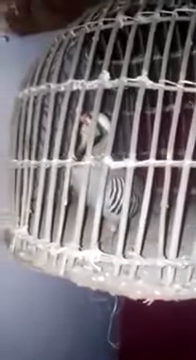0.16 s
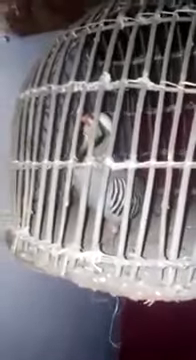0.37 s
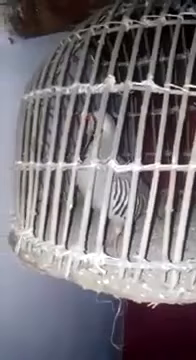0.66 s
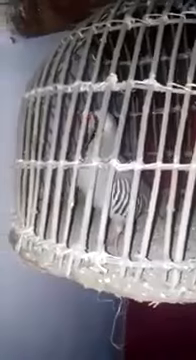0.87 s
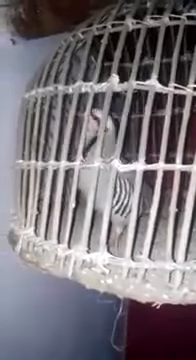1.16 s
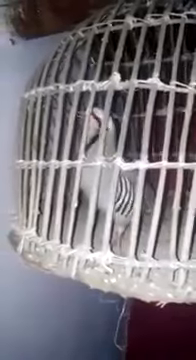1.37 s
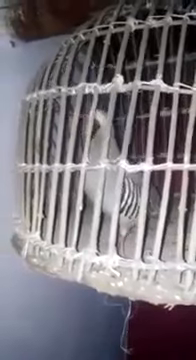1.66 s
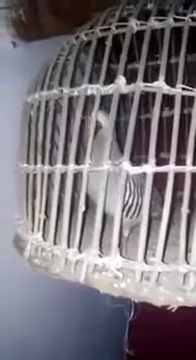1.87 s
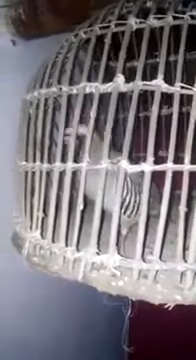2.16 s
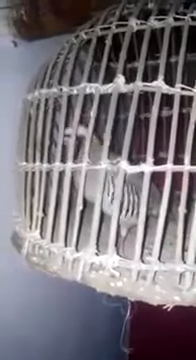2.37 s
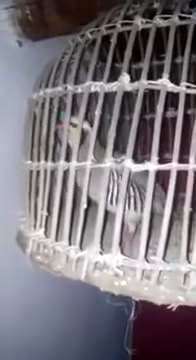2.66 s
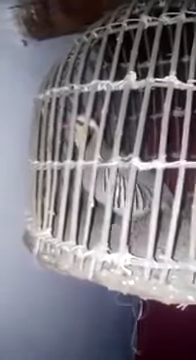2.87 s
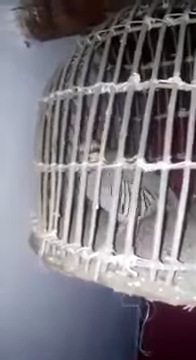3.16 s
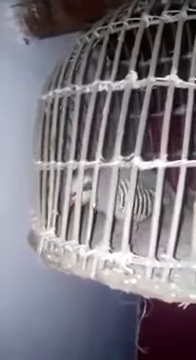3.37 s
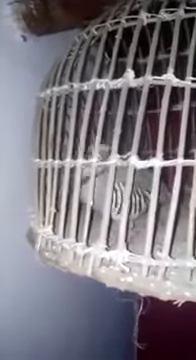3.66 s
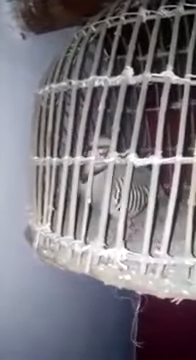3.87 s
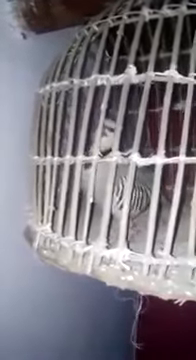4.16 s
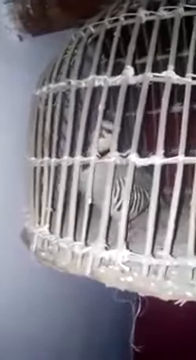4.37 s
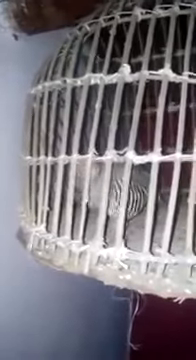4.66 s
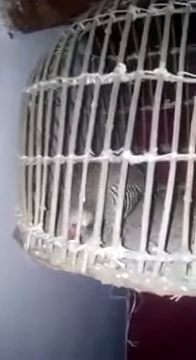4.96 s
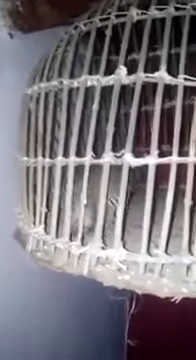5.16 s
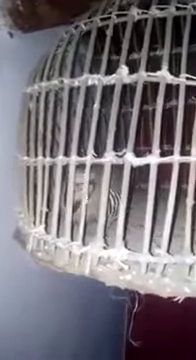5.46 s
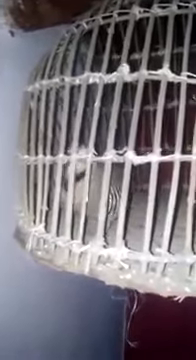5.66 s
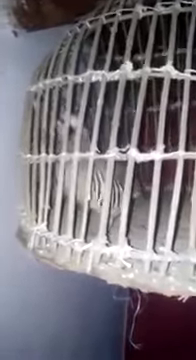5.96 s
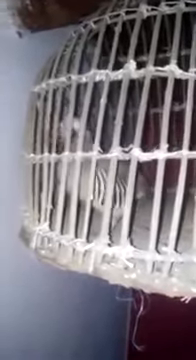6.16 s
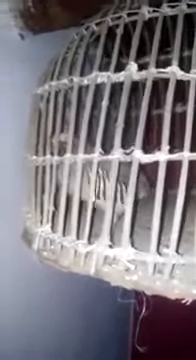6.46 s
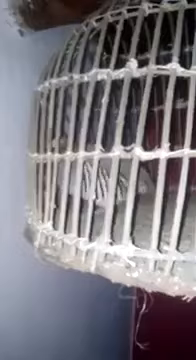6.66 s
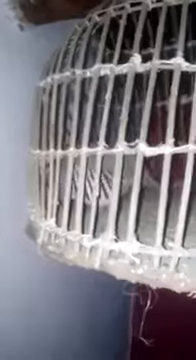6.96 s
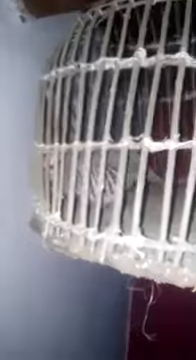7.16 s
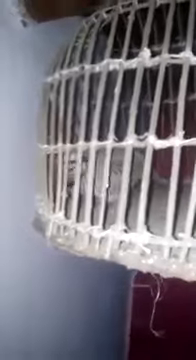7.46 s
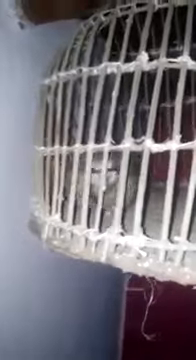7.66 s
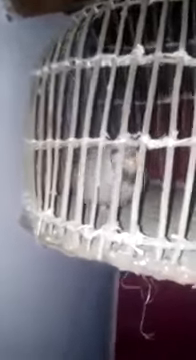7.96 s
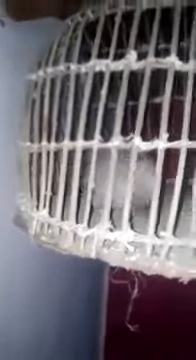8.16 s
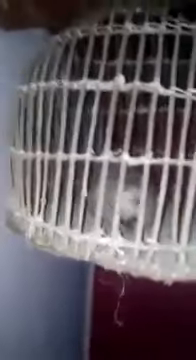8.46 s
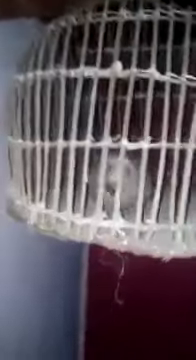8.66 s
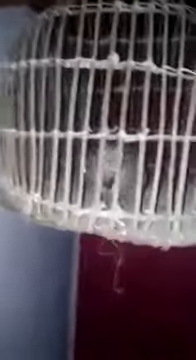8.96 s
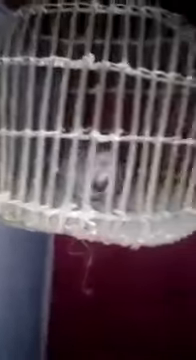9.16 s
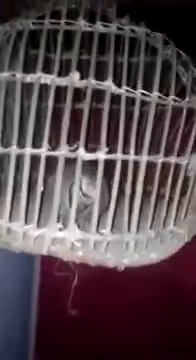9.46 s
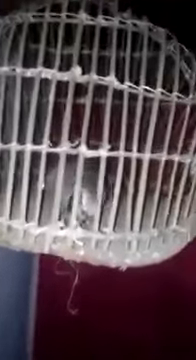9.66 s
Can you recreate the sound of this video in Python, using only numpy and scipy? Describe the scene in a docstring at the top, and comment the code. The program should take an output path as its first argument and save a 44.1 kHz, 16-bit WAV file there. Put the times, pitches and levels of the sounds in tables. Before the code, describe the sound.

A caged partridge calls loudly in rapid, harsh notes, then weakens into squeaks and short clucks, followed by soft bumps on the cage.

```python
"""Loud, harsh calls come first, with wheezes between: a partridge in a wicker cage, in a small hard room.
The calls weaken into squeaks and short clucks; then only soft bumps and scratches on the cage are left.
The voice is a source and a filter: the two sides of the syrinx chop the breath into pulses, and the
resonances of throat and beak shape them. Near walls add dense echoes over a faint drone,
and the loud calls drive the nearby recorder into its limiter."""
import sys
import numpy as np
from scipy import signal
from scipy.fft import rfft, irfft, next_fast_len
from scipy.io import wavfile
from scipy.ndimage import uniform_filter1d, minimum_filter1d, map_coordinates

SR = 44100
rng = np.random.default_rng(int(sys.argv[2]) if len(sys.argv) > 2 else 0)


def int16_out(signal):
    """Quantize to a 16-bit WAV file."""
    q = np.round(np.clip(np.atleast_2d(signal).T, -1, 1) * 32767)
    wavfile.write(sys.argv[1], SR, q.astype(np.int16))


N = 432614

# The room's low drone. Each row: time in seconds, level in dB.
DRONE_LEVELS = [(0, -66), (1.6, -72), (2.5, -61), (4.8, -78), (6.5, -87), (9.8, -96)]
# Reverberation. Each row: frequency in Hz, time to decay by 60 dB in seconds.
ROOM_T60 = [(150, .18), (500, 0.28), (1400, 0.26), (4000, .21), (10000, 0.25)]
# Spectral envelopes of the noises and of the voice. Each row: frequency in Hz, relative gain in dB.
FLOOR_SPECTRUM = [(20, -8.5), (50, -10.5), (85, 2), (130, -2), (400, -22.5), (1500, -33), (13000, -36)]
SCRATCH_SPECTRUM = [(300, -3), (1200, -20), (2200, -13.5), (3500, 2), (5500, 0), (8000, -11.5),
                    (13000, -21.5)]
WHEEZE_SPECTRUM = [(300, -10), (800, 9.5), (1200, -7), (2500, -0.5), (3400, -21), (4300, -14), (5000, -4),
                   (5800, 7), (9000, -17.5)]
CLUCK_SPECTRUM = [(200, -19), (400, -6.5), (650, -3.5), (1250, -2), (1700, -23), (3000, -43), (8000, -50.5)]
THROAT_SPECTRUM = [(300, -69), (600, -3.5), (850, 1.5), (1300, 10), (2500, 7), (3200, 0), (3900, -18.5),
                   (6000, -41), (9000, -53)]
BEAK_SPECTRUM = [(1200, -43), (2400, -7), (3000, -7.5), (6800, -7.5), (7500, -7.5), (8300, -19.5),
                 (10000, -8), (13000, -0.5)]
SHRIEK_SPECTRUM = [(1200, -47), (2400, -9), (3000, 1), (6800, -11.5), (8300, -12.5), (10000, -8),
                   (13000, -10.5)]
SQUEAL_SPECTRUM = [(2000, -28), (3400, -2), (5200, -1), (6800, -2.5), (8500, -21), (13000, -30.5)]
# Resonances of the bird's airway. Each row: centre in Hz, bandwidth in Hz, relative gain in dB.
WHEEZE_FORMANTS = [(1237.4, 250, -1), (1670, 33, 16.5), (2100, 250, 7.5), (5000, 400, -6)]
SNAP_FORMANTS = [(2063, 340, 3), (3600, 350, 0), (4160, 420, -2), (5426, 930, -11), (6230, 770, -14)]
RASP_FORMANTS = [(3790, 200, -15), (4953, 240, 1.5), (6470, 620, -1.5)]
SHRIEK_FORMANTS = [(2680, 350, 1.5), (3510, 100, 7.5), (3850, 800, -2), (5400, 1000, -2.5), (5830, 460, -3)]
SQUEAL_FORMANTS = [(3880, 500, -6.5), (4860, 550, 0.5), (6320, 1100, -10.5)]
# Contacts with the cage. Each row: start in seconds, thud level in dB, thud cutoff in Hz,
# scratch level in dB, rise time in seconds.
CAGE_CONTACTS = [(5.241, -47, 300, -36, 0.003), (6.422, -65, 300, -45, 0.0048),
                 (8.143, -49, 334, -59.5, 0.013), (8.205, -61, 300.6, -44, .004),
                 (8.27, -59, 299, -55.5, 0.008), (8.382, -46.5, 643, -44.5, 0.01),
                 (8.48, -50, 300, -63.5, 0.0035), (8.506, -59, 200.5, -59.5, 0.0101),
                 (8.582, -71, 298, -48.5, 0.015), (8.818, -43.5, 390, -56, 0.013),
                 (9.04, -64, 200, -59, 0.031), (9.294, -66, 400, -55.5, 0.025),
                 (9.55, -58, 150.3, -83, .01), (9.64, -61.5, 150, -82, .012), (9.75, -68, 402, -52, 0.014),
                 (9.774, -38.5, 675, -36.5, .014)]
# Breaths between calls. Each row: start in seconds, length in seconds.
BREATHS = [(0, 0.095), (0.38, 0.085), (0.802, 0.081), (1.21, 0.092), (1.643, 0.082), (2.067, 0.064),
           (2.502, 0.084), (3.124, 0.075), (3.216, 0.077), (3.555, 0.16), (3.873, 0.21), (4.154, 0.062),
           (4.443, 0.018)]
# Clucks. Each row: start in seconds, length in seconds, final pitch in Hz, tone level in dB,
# snap level in dB.
CLUCK_NOTES = [(6.438, .038, 552.2, -33.5, -25.5), (6.473, 0.042, 543, -34.5, -31),
               (6.527, 0.012, 423.3, -33.5, -35), (6.682, 0.045, 640, -35, -31.5),
               (6.734, 0.014, 751, -31, -20.5), (6.844, .041, 637.5, -29.5, -24),
               (7.017, .039, 825, -32, -22.5), (7.061, 0.023, 763.5, -33, -24),
               (7.102, .019, 689.6, -35, -26.5), (7.171, 0.036, 417.3, -31.5, -27),
               (7.294, .056, 651, -26, -20.5), (7.388, 0.024, 384.8, -30.5, -23),
               (7.558, 0.014, 567, -39.5, -39), (7.577, .018, 592.2, -32, -15.5),
               (7.615, 0.0092, 549, -32, -11), (7.651, .021, 548, -30.5, -21.5),
               (7.896, .02, 589.6, -41.5, -39.5), (7.925, 0.046, 606, -50.5, -60)]
# Calls. Each row: start, length and attack in seconds, level in dB, relative levels of fundamental and
# rasp in dB, gape from 0 to 1, delay of the widest gape in seconds, base centre and bandwidth of the
# throat resonance in Hz, lower voice's mid-call pitch in Hz, then, from 0 to 1, base roughness,
# upper voice's share and base shriek share.
CALL_NOTES = [ (0.114, .226, 0.029, -7.5, -21, -16, 0.16, .04, 1504, 601, 484, 0.79, 0.43, 0.09),
              (0.523, 0.22, 0.013, -7.5, -18.5, -15, 0.87, 0.089, 1497, 557, 472.5, 0.7, 0.5, 0.06),
              (0.932, 0.23, 0.018, -7.5, -16.5, -16, 0.79, 0.096, 1462, 402, 455.7, 0.46, 0.37, 0.07),
              (1.358, 0.24, 0.018, -7.5, -18.5, -14, 0.89, 0.084, 1481, 334, 456.2, 0.57, 0.63, 0.09),
              (1.779, 0.21, 0.027, -10, -15, -12, .05, 0.021, 1454, 360, 479.2, 0.51, 0.16, 0.06),
              (2.137, 0.27, 0.036, -8, -19, -15.5, 1, .105, 1502, 540, 494.6, 0.74, 0.47, 0.04),
              (2.529, 0.25, 0.03, -6.5, -19.5, -14.5, 0.87, 0.097, 1597, 616, 505.8, 0.66, 0.37, 0.13),
              (2.938, .178, 0.022, -9, -15.5, -14.5, 0.18, 0.089, 1385, 450, 471.3, 0.49, .3, 0.1),
              (3.277, 0.19, 0.02, -9.5, -26, -15.5, 0.22, .11, 1712, 1100, 851, 0.57, 0.6, 0.8),
              (3.583, 0.2, 0.037, -7, -29.5, -20, 0.16, 0.11, 1783, 518, 925, 0.38, .4, 0.2),
              (3.92, .17, 0.013, -9, -16, -14.5, 0.21, 0.063, 1717, 419, 467, 0.47, 0.23, 0.37),
              (4.209, 0.16, 0.015, -3.5, -26.5, -17, 0.9, 0.077, 1791, 680, 793.6, 0.58, 0.13, 0.18),
              (4.557, .188, 0.026, -8, -29.5, -16, 0.48, 0.1, 1760, 1000, 850.6, 0.6, 0.42, 0.5),
              (4.978, 0.17, 0.12, -16.5, -16, 1.5, .4, .115, 1420, 454.5, 607.5, 0.57, .8, 0.93),
              (5.188, 0.038, 0.028, -22, -16.5, 1.5, 0.26, 0.013, 1353, 900, 592.4, .7, 0, 0.9),
              (5.296, .113, 0.017, -22, -17.5, -6.5, 0.97, 0.02, 1060, 200, 509, 0.6, 0.2, 0.8),
              (5.471, 0.097, 0.019, -20, -18, -20.5, 0.75, .022, 1378, 700, 643, 0.31, 0.03, 0.44),
              (5.689, 0.13, 0.025, -17.5, -25, -18, 0.45, 0.016, 1486, 457, 437, 0.42, 0.47, 0.9),
              (5.969, 0.16, 0.019, -20.5, -17.5, -19, 0.41, 0.018, 1295, 463, 635, 0.63, 0.46, 0.32),
              (6.203, 0.059, 0.023, -18, -11.5, -2.5, 0.12, 0.036, 2051, 1500, 488, 0.73, 1, 1)]

TOP_HZ = 13150


def amp(db):
    """Amplitude ratio of a level in decibels."""
    return 10 ** (np.asarray(db) / 20)


def unit(x):
    """Normalisation to an rms of 1."""
    return x / np.sqrt(np.mean(x ** 2) + 1e-20)


def along(points, hz):
    """Interpolation of (Hz, value) points on a logarithmic frequency axis."""
    f, v = np.transpose(points)
    return np.interp(np.log(hz + 1), np.log(f), v)


def filtered(x, response):
    """Linear filtering: the spectrum is multiplied by a frequency response."""
    n = x.shape[-1]
    m = next_fast_len(n + 4096)
    return irfft(rfft(x, m) * response(np.fft.rfftfreq(m, 1 / SR)), m)[..., :n]


def coloured(x, points):
    """Spectral shaping by a (Hz, dB) envelope, at rms 1."""
    return unit(filtered(x, lambda hz: amp(along(points, hz))))


def resonant(x, modes):
    """Superposition of damped (Hz, width in Hz, dB) resonances of alternating sign, at rms 1."""
    def response(hz):
        return sum((-1) ** k * amp(db) * 1j * hz * width / (centre ** 2 - hz ** 2 + 1j * hz * width)
                   for k, (centre, width, db) in enumerate(modes))
    return unit(filtered(x, response))


def wobble(n, rate):
    """Smooth random modulation: a spline through `rate` knots a second."""
    knots = rng.standard_normal(1024)
    return map_coordinates(knots, [np.arange(n) * rate / SR], mode='wrap')


def gate(n, rise, fall):
    """A trapezoidal envelope of n samples; rise and fall are in seconds."""
    t = np.arange(n) / SR
    return np.clip(t / rise, 0, 1) * np.clip((t[-1] - t) / fall, 0, 1)


def blend(a, b, share):
    """Uncorrelated sounds add in power; b supplies the given share."""
    share = np.clip(share, 0, 1)
    return np.sqrt(1 - share) * a + np.sqrt(share) * b


def add(track, start, x):
    """Superposition of x on the track, from a start in seconds."""
    part = track[max(round(start * SR), 0):][:len(x)]
    part += x[:len(part)]


def background(floor_db=-80):
    """Narrow-band noise is heard as a low drone, above a broad noise floor."""
    drone = resonant(resonant(rng.standard_normal(N), [(84, 51, 0)]), [(84, 81, 0)])
    drone_db = np.interp(np.arange(N) / SR, *np.transpose(DRONE_LEVELS))
    return amp(drone_db) * drone + amp(floor_db) * coloured(rng.standard_normal(N), FLOOR_SPECTRUM)


def room(x, first_echo_s=0.0009):
    """Reverberation: dense wall echoes decay exponentially, giving a short, hard ring."""
    out, hop = np.zeros(N), SR // 3
    crossfade = signal.get_window('hann', 2 * hop)
    for start in range(0, N, hop):
        hz, t, noise = signal.stft(rng.standard_normal(SR // 3), SR, nperseg=256)
        decay = amp(-60 * t / along(ROOM_T60, hz)[:, None])
        tail = signal.istft(noise * decay, SR, nperseg=256)[1]
        tail *= np.arange(len(tail)) > first_echo_s * SR
        piece = np.pad(x, (hop // 2, 2 * hop))[start:start + 2 * hop] * crossfade
        echo = signal.fftconvolve(piece, tail / np.linalg.norm(tail))
        add(out, max(start - hop // 2, 0) / SR, echo[max(hop // 2 - start, 0):])
    return out


def cage_contacts(thud_t60=0.21, scratch_t60=0.11):
    """Impact and friction: bumps give a dull thud, claws on wicker a dry scratch."""
    out, n = np.zeros(N), SR // 4
    t = np.arange(n) / SR
    for start, thud_db, cutoff_hz, scratch_db, rise in CAGE_CONTACTS:
        envelope = lambda t60: np.minimum(t / rise, 1) * amp(-60 * np.maximum(t - rise, 0) / t60)
        bass_band = lambda hz: (hz / np.hypot(hz, 60)) ** 2 / (1 + (hz / cutoff_hz) ** 4)
        thud = unit(filtered(rng.standard_normal(n), bass_band)) * envelope(thud_t60)
        friction = rng.standard_normal(n) * amp(2.3 * wobble(n, rate=219.3))
        scratch = coloured(friction, SCRATCH_SPECTRUM) * envelope(scratch_t60)
        add(out, start, amp(thud_db) * thud + amp(scratch_db) * scratch)
    return out


def syrinx(pitch_hz, rough, jitter=0.038, shimmer_db=3, flutter_rate=260):
    """Membranes pulse the airflow; roughness adds jitter, shimmer and a puff of noise in every cycle."""
    n, rough = len(pitch_hz), np.clip(rough, 0, 1)
    hz = pitch_hz * np.exp(jitter * rough * wobble(n, flutter_rate))
    phase = 2 * np.pi * np.cumsum(hz) / SR
    harmonics = np.arange(1, int(TOP_HZ / hz.mean()) + 1)[:, None]
    pulses = unit(np.cos(harmonics * phase).sum(0))
    air = unit(rng.standard_normal(SR)[:n] * (1 + np.cos(phase)))
    return blend(pulses, air, rough) * amp(shimmer_db * rough * wobble(n, flutter_rate))


def wheezes(pitch_hz=570., level_db=-27.5):
    """Turbulence: air drawn through the half-closed syrinx excites the airway's resonances."""
    out = np.zeros(N)
    for start, length in BREATHS:
        n = int(length * SR)
        breath = syrinx(np.full(n, pitch_hz), rough=0.98)
        wheeze = coloured(resonant(breath, WHEEZE_FORMANTS), WHEEZE_SPECTRUM)
        add(out, start, amp(level_db) * wheeze * gate(n, rise=0.011, fall=0.035))
    return out


def clucks(glide_octaves=0.19, swell_db=18, snap_gain_db=2):
    """Abrupt closure strengthens overtones: a soft rising tone ends in a snap as membranes slap shut."""
    out = np.zeros(N)
    for start, length, pitch_hz, tone_db, snap_db in CLUCK_NOTES:
        n = int(length * SR)
        to_go = np.linspace(1, 0, n)
        pitch = pitch_hz * 2 ** (-glide_octaves * to_go ** 2)
        tone = coloured(syrinx(pitch, rough=.18), CLUCK_SPECTRUM) * gate(n, rise=length / 2, fall=.003)
        slap = resonant(syrinx(pitch, rough=.62), SNAP_FORMANTS)
        snap = coloured(slap, [(500, -20), (1800, -3), (6800, 2.0), (8500, -11)])
        snap *= amp(snap_gain_db - swell_db * to_go) * gate(n, rise=0.008, fall=0.005)
        add(out, start, amp(tone_db) * tone + amp(snap_db) * snap)
    return out


def upper_voice(centre_hz, rough, waver=.06, waver_rate=150, shimmer_db=2):
    """Formant tuning: one side of the syrinx wavers with its second harmonic on the throat resonance."""
    n = len(centre_hz)
    pitch = centre_hz / 2 * np.exp(waver * rough * wobble(n, waver_rate))
    return unit(syrinx(pitch, rough ** 2) * amp(shimmer_db * wobble(n, waver_rate)))


def throat(x, centre_hz, width_hz):
    """A moving formant filters the voice, whose short-term power is held constant."""
    hz, t, spectra = signal.stft(x, SR, nperseg=256, noverlap=192)
    centre = np.interp(t * SR, np.arange(len(x)), centre_hz)
    gain = amp(along(THROAT_SPECTRUM, hz))[:, None] / np.hypot(1, 2 * (hz[:, None] - centre) / width_hz)
    voice = signal.istft(spectra * gain, SR, nperseg=256, noverlap=192)[1][:len(x)]
    return voice / np.sqrt(np.abs(uniform_filter1d(voice ** 2, size=1300)) + 1e-20)


def beak_opening(t, open_s=.03, close_s=0.046):
    """An asymmetric bell curve: the beak opens quickly, is widest at t = 0 and closes more slowly."""
    return np.exp(-(t / np.where(t < 0, open_s, close_s)) ** 2)


def beak_rasp(overtones, centre_hz, shriek_share, open_hz=1700, span_hz=700, shriek_db=2):
    """Airway formants colour the overtones; a wide-open beak turns their rasp into a shriek."""
    rasp = coloured(resonant(overtones, RASP_FORMANTS), BEAK_SPECTRUM)
    shriek = amp(shriek_db) * coloured(resonant(overtones, SHRIEK_FORMANTS), SHRIEK_SPECTRUM)
    return blend(rasp, shriek, shriek_share + np.maximum(centre_hz - open_hz, 0) / span_hz)


def calls():
    """Biphonation: a lower voice settles mid-call while an upper one arches as the beak opens."""
    sag_octaves_per_s, scoop_octaves, gape_lift_hz = .8, .2, 541  # motion of the throat resonance
    rest_hz, slack_share = 613.8, .45  # at both ends the lower voice slackens towards rest
    edge_rough, gape_clearing = 0.25, .45
    swell_db, low_swell_db, low_trim_db = 5, 3.5, -3
    rasp_trim_db, rasp_fade_db, gape_rasp_db, squeal_db = -1, 7.5, 6.5, 7
    out = np.zeros(N)
    for (start, length, attack, level_db, low_db, rasp_db, gape, gape_delay,
         throat_hz, width_hz, pitch_hz, rough, upper_share, shriek_share) in CALL_NOTES:
        t = np.arange(int(length * SR)) / SR
        edge = np.linspace(-1, 1, len(t)) ** 2  # 1 at both ends, 0 mid-call
        opening = beak_opening(t - gape_delay)
        centre = throat_hz * 2 ** (-sag_octaves_per_s * t - scoop_octaves * edge ** 2)
        centre += gape_lift_hz * gape * opening
        pitch = pitch_hz * (rest_hz / pitch_hz) ** (slack_share * edge)
        lower = syrinx(pitch, rough + edge_rough * edge)
        upper = upper_voice(centre, rough * (1 - gape_clearing * gape * opening))
        fundamental = resonant(resonant(lower, [(530, 250, 0)]), [(528, 280, 0)])
        middle = blend(throat(lower, centre, width_hz), throat(upper, centre, width_hz), upper_share)
        overtones = blend(lower, upper, share=.6)
        rasp = beak_rasp(overtones, centre, shriek_share)
        squeal = coloured(resonant(overtones, SQUEAL_FORMANTS), SQUEAL_SPECTRUM)
        burst = gape * opening ** 3  # the widest gape lets out a squeal and extra rasp
        voice = (amp(-swell_db * edge) * middle
                 + amp(low_db + low_trim_db - low_swell_db * edge) * fundamental
                 + amp(rasp_db + rasp_trim_db - rasp_fade_db * t / length + gape_rasp_db * burst) * rasp
                 + amp(rasp_db + squeal_db) * burst * squeal)
        add(out, start, voice * amp(level_db) * gate(len(t), rise=attack, fall=0.017))
    return out


def scene(direct_db=-1.5, room_db=-4, side_db=-8):
    """Direct and reverberant fields add; only the treble echoes differ between left and right."""
    direct = calls() + clucks() + wheezes() + cage_contacts()
    mid = amp(direct_db) * direct + amp(room_db) * room(direct) + background()
    side = amp(side_db) * filtered(room(direct), lambda hz: np.clip((hz - 3200) / 1200, 0, 1))
    return np.array([mid + side, mid - side])


def record(dry, ceiling=1.124, clip_level=0.92, hardness=5, quiet_db=-58, depth_db=-9):
    """Nonlinear gain: quiet stretches are turned down, loud calls limited, peaks saturated; then a low-pass."""
    power = np.abs(uniform_filter1d(dry.mean(0) ** 2, size=700))
    suppressor_gain = amp(depth_db / (1 + power / amp(quiet_db) ** 2))
    safe_gain = np.minimum(1, ceiling / (np.abs(dry).max(0) + 1e-9))
    limiter_gain = uniform_filter1d(minimum_filter1d(safe_gain, size=130), size=130)
    held = dry * suppressor_gain * limiter_gain
    saturated = held / (1 + np.abs(held / clip_level) ** hardness) ** (1 / hardness)
    return filtered(saturated, lambda hz: hz < TOP_HZ)


dry = scene()
out = record(dry)
int16_out(out)
```